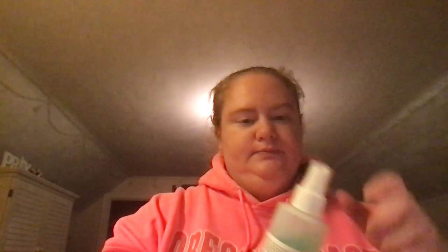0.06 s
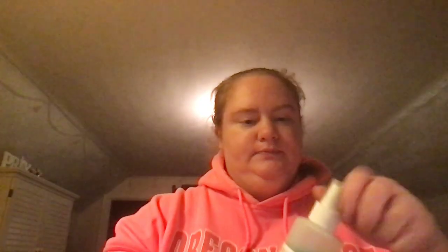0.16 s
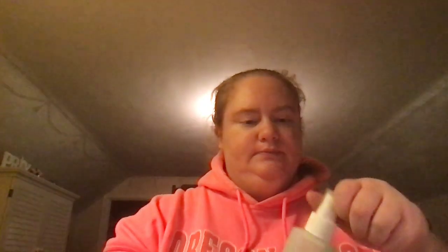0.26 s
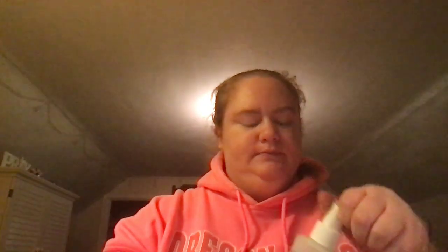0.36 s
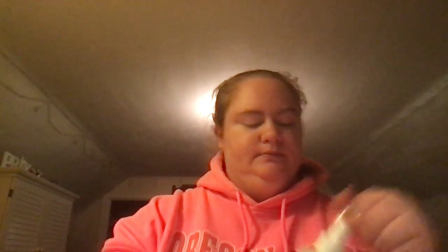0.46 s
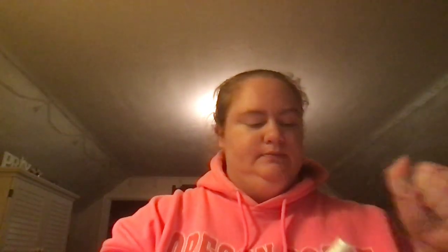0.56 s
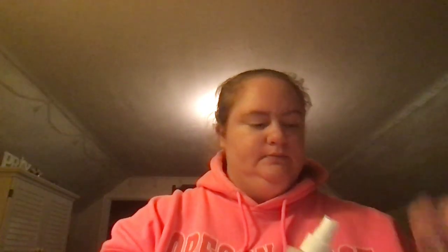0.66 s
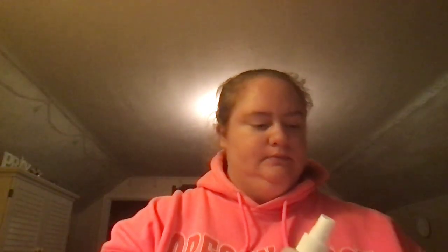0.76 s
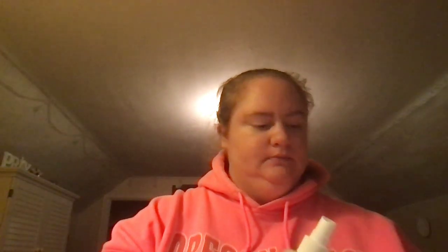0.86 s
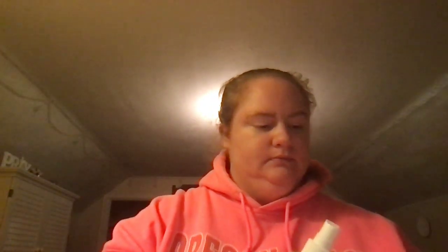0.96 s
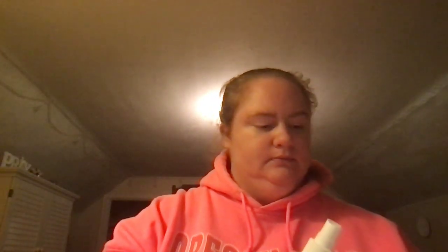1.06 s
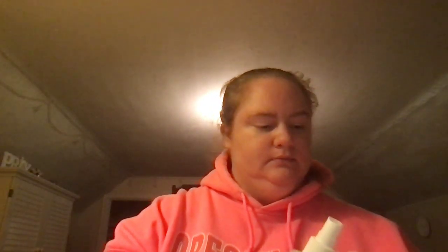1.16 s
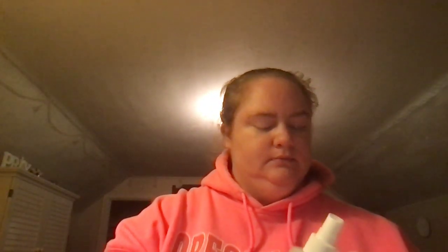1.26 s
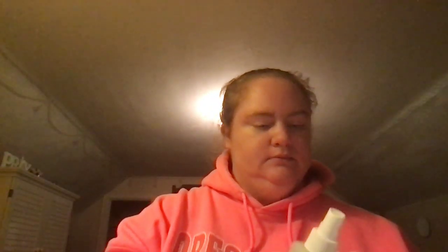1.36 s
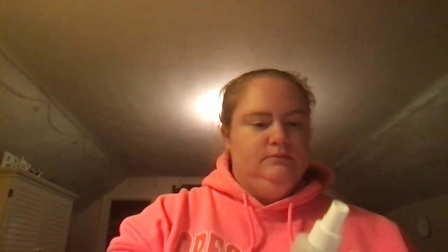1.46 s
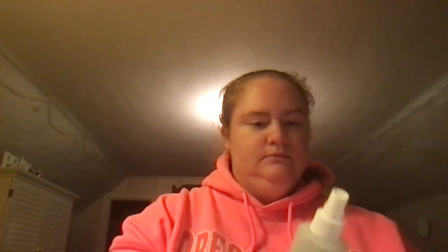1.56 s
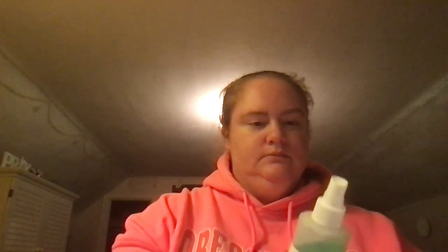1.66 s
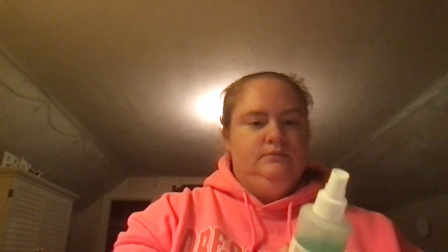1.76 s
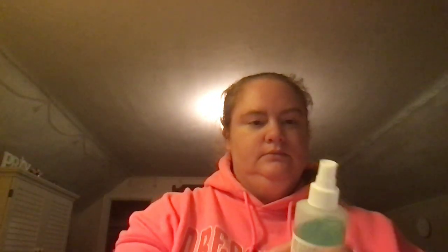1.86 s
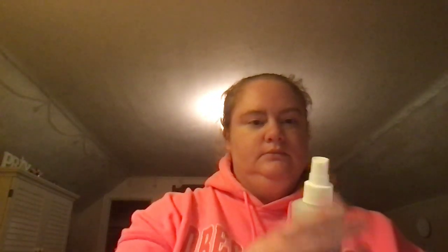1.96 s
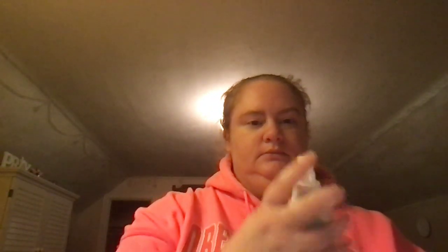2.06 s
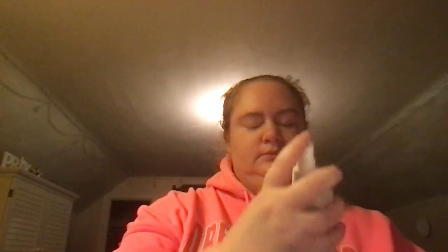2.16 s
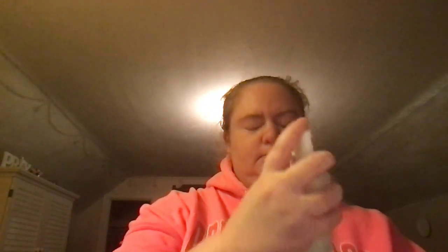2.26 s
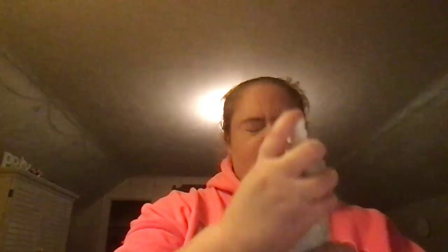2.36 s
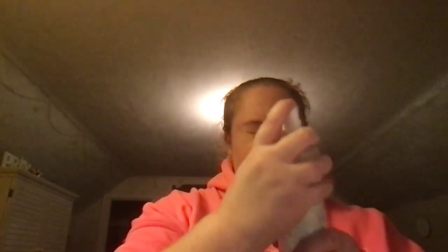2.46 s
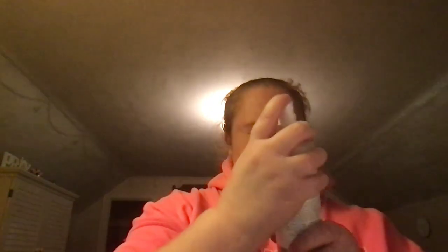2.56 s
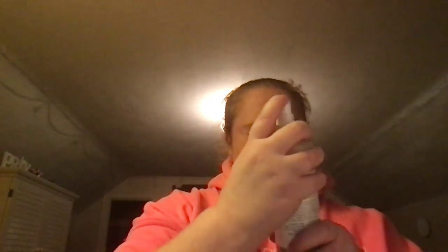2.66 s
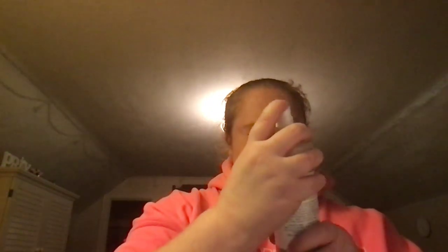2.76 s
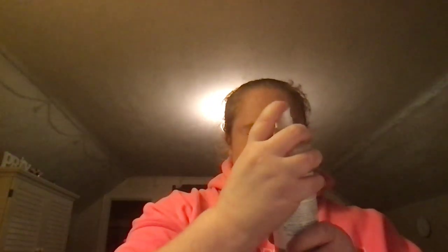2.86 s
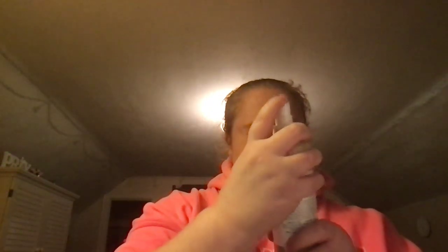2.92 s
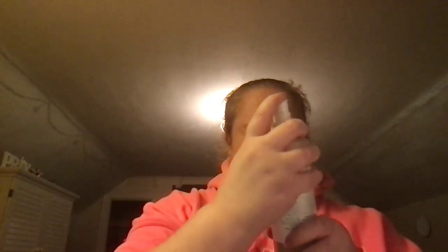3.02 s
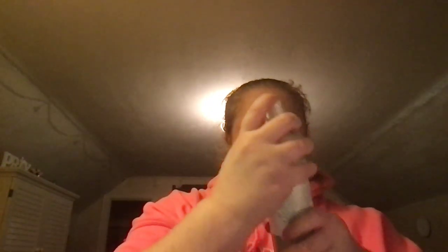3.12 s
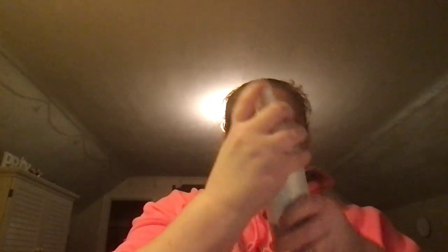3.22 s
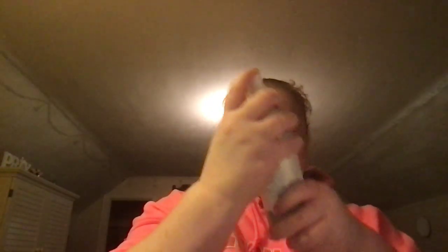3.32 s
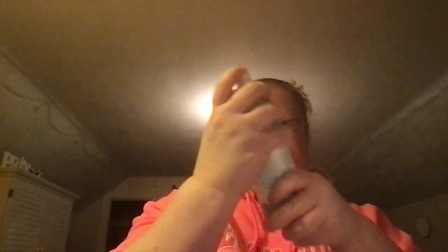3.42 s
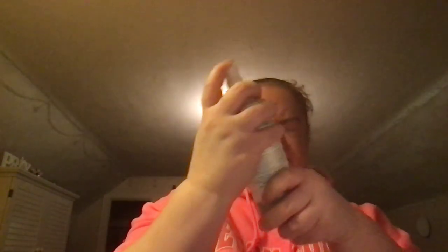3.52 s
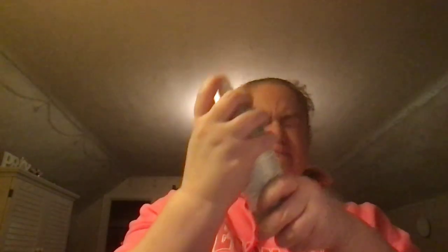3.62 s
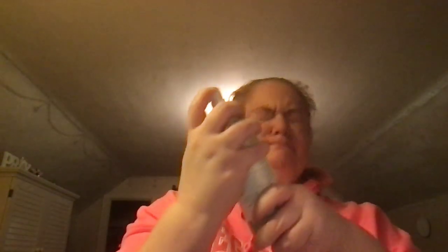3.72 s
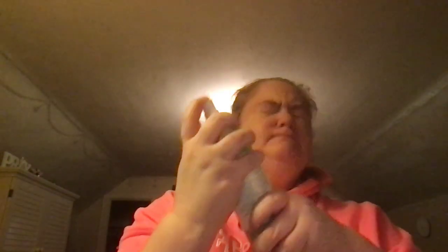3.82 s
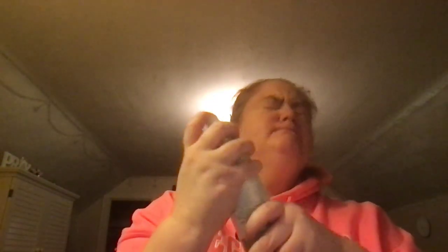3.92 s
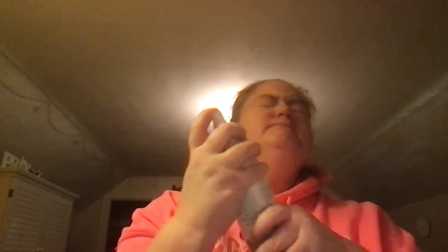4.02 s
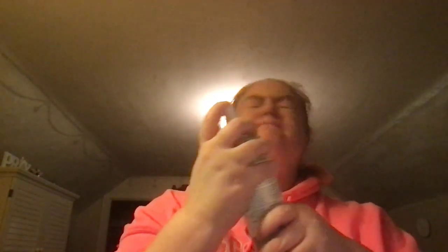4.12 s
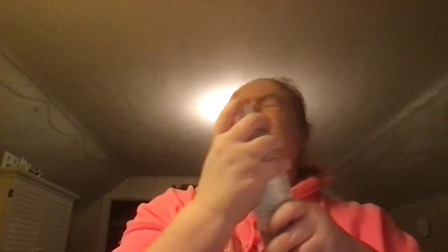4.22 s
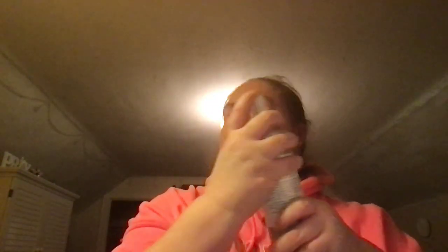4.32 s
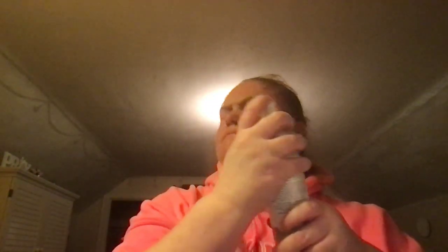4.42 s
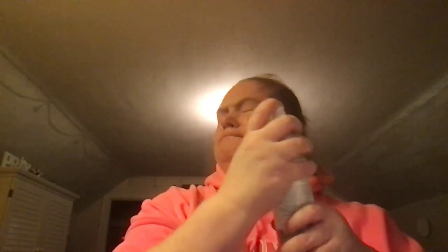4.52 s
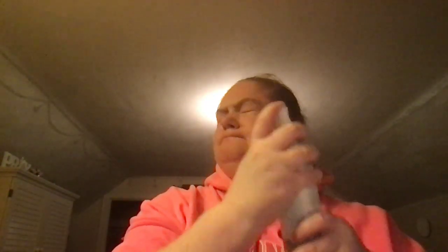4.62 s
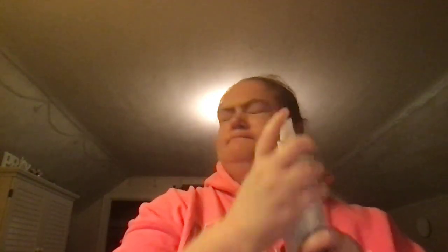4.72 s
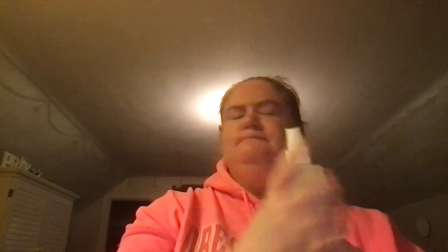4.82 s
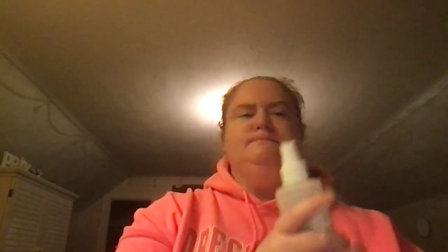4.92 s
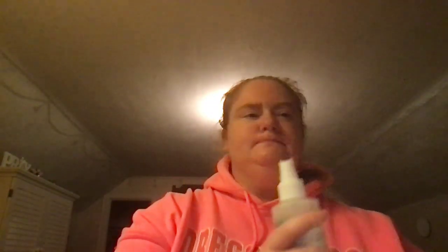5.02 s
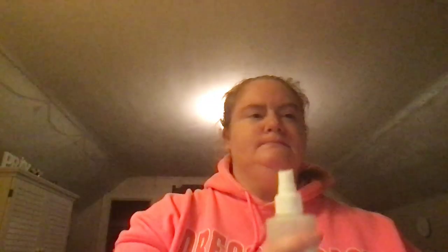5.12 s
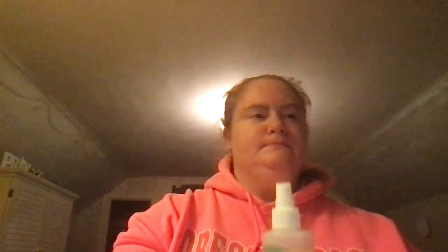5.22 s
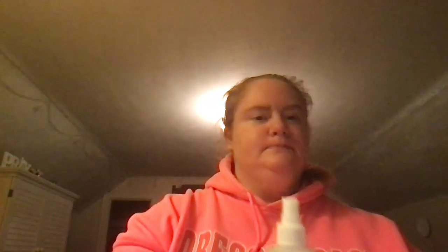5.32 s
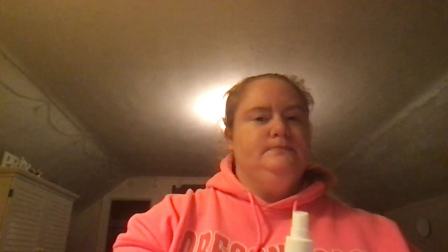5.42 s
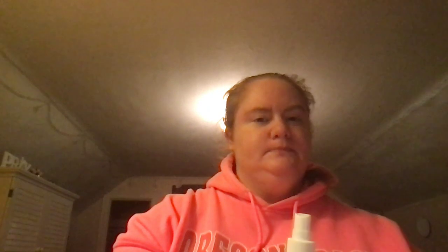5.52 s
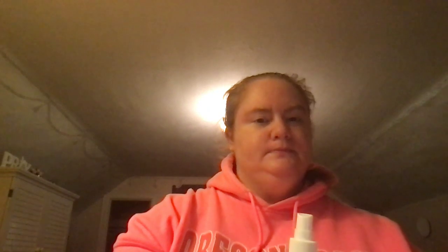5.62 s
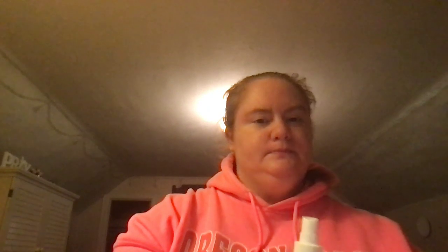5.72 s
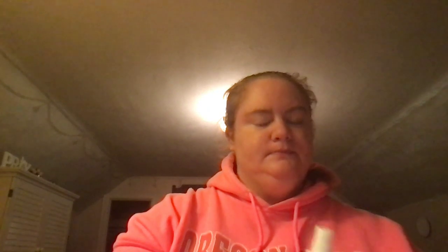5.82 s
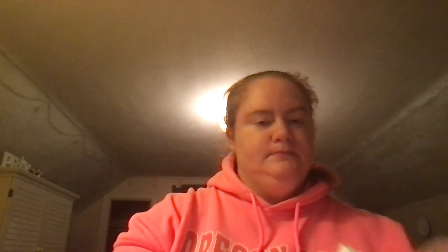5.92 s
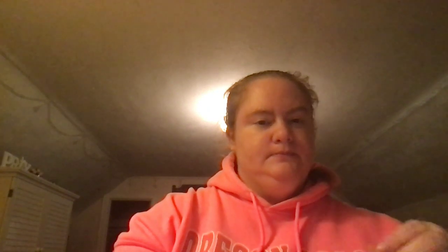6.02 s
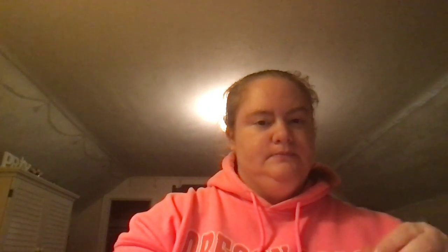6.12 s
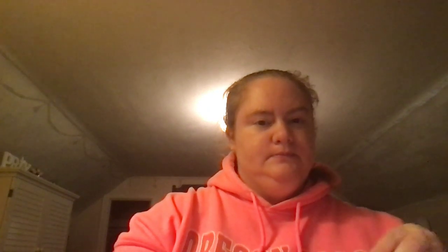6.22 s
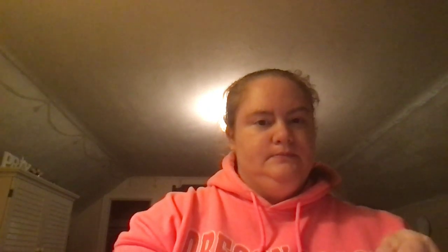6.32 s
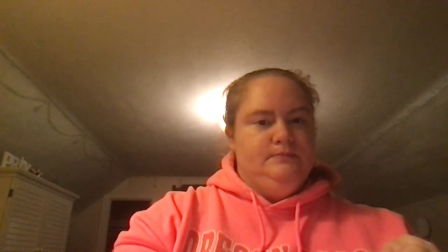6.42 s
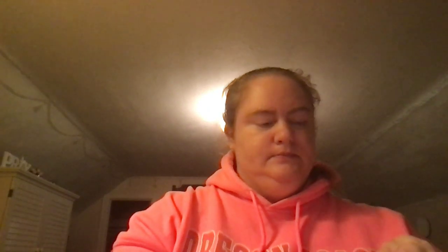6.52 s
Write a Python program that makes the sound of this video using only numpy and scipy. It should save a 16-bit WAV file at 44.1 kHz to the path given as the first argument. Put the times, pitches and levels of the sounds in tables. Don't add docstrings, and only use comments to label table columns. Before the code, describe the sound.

A hollow plastic cap snaps off and clatters on a desk, a pump sprayer clicks out seven quick mists, then the cap snaps back on.

```python
import sys
import numpy as np
from scipy import signal
from scipy.fft import rfft, irfft, next_fast_len
from scipy.io import wavfile
from scipy.ndimage import uniform_filter1d, map_coordinates

SR = 44100
rng = np.random.default_rng(int(sys.argv[2]) if len(sys.argv) > 2 else 0)


def level_to_linear(level):
    exponent = np.asarray(level, float) / 20
    return 10 ** exponent


def pcm_store(signal):
    levels = np.round(np.clip(np.atleast_2d(signal), -1, 1) * 32767)
    wavfile.write(sys.argv[1], SR, levels.astype(np.int16).T)


N = 290178


def unit(x):
    return x / np.sqrt(np.mean(x ** 2) + 1e-20)


def along(points, hz):
    point_hz, value = np.transpose(points)
    return np.interp(np.log(hz + 1), np.log(point_hz + 1), value)


def curve(rows):
    s, db = np.transpose(rows)
    return np.interp(np.arange(N) / SR, s, db)


def wobble(rate):
    knots = rng.standard_normal(int(N * rate / SR) + 4)
    return map_coordinates(knots, [np.arange(N) * rate / SR])


def soft(gain):
    return uniform_filter1d(gain, size=300)


def swells(rows):
    t, total = np.arange(N) / SR, np.zeros(N)
    for s, hold, db, rise, fall in rows:
        below_db = 20 * np.maximum(s - t, 0) / rise + 20 * np.maximum(t - s - hold, 0) / fall
        total += level_to_linear(db - below_db)
    return total


def hiss(spectrum, grain_db):
    m = next_fast_len(N + 8192)
    grain = uniform_filter1d(rng.standard_normal(N), size=24) * np.sqrt(24)
    white = rng.standard_normal(N) * level_to_linear(grain_db * grain)
    colour = level_to_linear(along(spectrum, np.fft.rfftfreq(m, 1 / SR)))
    return unit(irfft(rfft(white, m) * colour, m)[:N])


def patchy(x, depth_db):
    z = signal.stft(x, nperseg=512)[2]
    field = uniform_filter1d(rng.standard_normal(z.shape), size=14, axis=0)
    field = uniform_filter1d(field, size=12, axis=1)
    return unit(signal.istft(z * level_to_linear(depth_db * unit(field)), nperseg=512)[1][:N])


def ring(t, hz, t60, attack=0.00024):
    return np.sin(2 * np.pi * hz * t) * level_to_linear(-60 * t / t60) * (1 - np.exp(-t / attack))


def burst(t, lo_hz, hi_hz, t60):
    band = signal.butter(3, np.clip([lo_hz, hi_hz], 50, .45 * SR), "band", fs=SR, output="sos")
    noise = unit(signal.sosfilt(band, rng.standard_normal(len(t))))
    return noise * level_to_linear(-60 * t / t60) * (1 - np.exp(-t / 0.00012))


def add(track, s, sound):
    track[round(s * SR):][:len(sound)] += sound


def taps(table, clack_db, attack=0.00016, top_db=-10):
    out, t = np.zeros(N + SR), np.arange(SR // 16) / SR
    for s, db, hz, t60, crack_db in table:
        shell = ring(t, hz, t60, attack) + level_to_linear(clack_db) * burst(t, .3 * hz, 2 * hz, .7 * t60)
        shell *= rng.choice([-1, 1])
        crack = burst(t, 3100, 7710, 0.0061) + level_to_linear(top_db) * burst(t, 8000, 16000, 0.0059)
        add(out, s, level_to_linear(db + 5.0) * shell + level_to_linear(db + crack_db + 7.5) * crack)
    return out[:N]


def thuds(table, thud_hz, thud_t60):
    out, t = np.zeros(N + SR), np.arange(SR // 5) / SR
    for s, db in table:
        low_hz = thud_hz * (1 + 0.074 * rng.standard_normal())
        body = ring(t, low_hz, thud_t60, 0.002)
        body += 0.79 * burst(t, 1.16 * low_hz, 1.98 * low_hz, 0.71 * thud_t60)
        add(out, s, level_to_linear(db + 5.5) * body)
    return out[:N]


def muffled(x):
    return signal.sosfilt(signal.butter(4, 2500, fs=SR, output="sos"), x)


# time in seconds, level in dB.
FAN_LEVEL = [(0.0, -56.5), (0.58, -53), (1.21, -60.5), (1.43, -70), (1.68, -72.5), (2.29, -53), (2.56, -57),
             (2.84, -90), (3.3, -85.5), (4.31, -74.5), (4.75, -63.5), (5.31, -60.5), (5.66, -65.5),
             (5.79, -60.5), (6.36, -61.5), (6.45, -81.5), (6.58, -72)]
# frequency in Hz, density in dB per Hz.
FAN_COLOUR = [(150, -45), (280, -4), (450, -3), (650, -14.5), (1100, -17), (2000, -16), (4000, -47.5),
              (8000, -120)]
AIR_COLOUR = [(12, -30), (25, -5), (50, 0), (90, -3), (130, -9), (220, -11), (800, -19), (1600, -22),
              (3200, -24), (5000, -29), (8000, -34), (13000, -36.5), (16000, -39)]


def air():
    fan_db = curve(FAN_LEVEL)
    fan = level_to_linear(fan_db - 7.5 + 1.4 * wobble(6.5)) * hiss(FAN_COLOUR, grain_db=1.5)
    tone_db = -67.5 + .17 * (fan_db - fan_db.mean()) + 0.23 * wobble(4.3)
    return fan + level_to_linear(tone_db) * hiss(AIR_COLOUR, grain_db=1.5)


# frequency in Hz, t60 in seconds.
ROOM_DECAY = [(200, 0.3), (2000, 0.12), (8000, 0.1), (15000, 0.05)]


def room(x):
    hz, t, z = signal.stft(rng.standard_normal(SR // 2), SR, nperseg=256)
    dying = z * level_to_linear(-60 * t / along(ROOM_DECAY, hz)[:, None])
    tail = signal.istft(dying, SR, nperseg=256)[1]
    delayed = np.pad(x, (150, 0))
    return signal.fftconvolve(delayed, tail / np.linalg.norm(tail))[:N]


# start in seconds,
# level in dB, frequency in Hz, t60 in seconds.
LOW_THUMPS = [(2.5, -65, 81, 0.12), (2.394, -49.5, 88, 0.33), (2.416, -52, 114.3, 0.19),
              (2.761, -49.5, 78.5, 0.15), (0.514, -45, 82, 0.078), (0.519, -34.5, 143, 0.095),
              (0.5469, -32.5, 314, 0.1), (1.2034, -35, 161.5, 0.072), (1.232, -45.5, 145, 0.16),
              (5.68, -42.5, 152, 0.14), (5.681, -35, 272, 0.051), (5.781, -33, 222, .04),
              (6.345, -30.5, 270, 0.04), (6.449, -29, 257, 0.051)]


def desk():
    out, t = np.zeros(N + SR), np.arange(SR // 4) / SR
    for s, db, hz, t60 in LOW_THUMPS:
        add(out, s, level_to_linear(db) * ring(t, hz, t60, 0.0019))
    return out[:N]


# full level at seconds, hold in seconds, level in dB, rise and fall in seconds.
SLEEVE_PASSES = [
    (1.412, 0.054, -60.5, 0.0083, 0.039),
    (1.676, 0.01, -72, 0.026, 0.02),
    (1.75, 0.046, -51, 0.02, 0.041),
    (1.89, 0.06, -56, .025, 0.097),
    (5.112, 0.019, -50.5, 0.02, 0.028),
]
# frequency in Hz, density in dB per Hz.
CLOTH_COLOUR = [(4000, -10), (6500, -11), (8500, -1.5), (11500, -6), (13500, -1), (16500, 0)]


def sleeve():
    gain = soft(swells(SLEEVE_PASSES) * level_to_linear(1.0 * wobble(29.95)))
    return gain * level_to_linear(-3.5) * patchy(hiss(CLOTH_COLOUR, grain_db=3.0), 2)


def clasp():
    u = np.clip((np.arange(N) / SR - 2.025) / .105, 0, 1)
    from_hz, to_hz, width_hz = 4500, 7600, 1100
    phase = 2 * np.pi * np.cumsum(from_hz + (to_hz - from_hz) * u) / SR
    band = wobble(width_hz) * np.cos(phase) + wobble(width_hz) * np.sin(phase)
    return level_to_linear(-49.5) * np.sin(np.pi * u) ** 0.95 * band


# full level at seconds, hold in seconds, level in dB, rise and fall in seconds.
FIRST_SLIDE = (.25, .025, -54, .05, .05)
FINGER_SLIDES = [
    (2.09, 0.039, -46.5, 0.27, 0.062),
    (5.032, 0.014, -58.5, 0.014, 0.05),
    (6.322, .002, -46, 0.0023, 0.03),
    (0.513, 0.039, -58, .02, 0.038),
]
PALM_SLIDES = [
    (4.79, 0.071, -54, 0.062, .04),
    (4.895, 0.077, -50, 0.092, 0.031),
]
CUPPED_WHISTLE = [
    (4.885, 0.064, -59, 0.15, 0.073),
]
# frequency in Hz, density in dB per Hz.
SKIN_COLOUR = [(2500, -12.5), (3800, -2.5), (5200, -0.5), (7800, -2.5), (10000, -10), (13500, -6),
               (16500, -12)]
WALL_COLOUR = [(1500, -28), (2400, 13.5), (4500, -8), (6000, -33), (8000, -50), (11000, -41)]
PALM_COLOUR = [(2800, -14.5), (4200, -1.5), (6000, -1.5), (8000, -1), (10000, -6), (13500, -4), (16500, -5)]
CUP_COLOUR = [(1900, -30), (2250, -4), (2500, -3), (2750, -13), (3300, -45)]


def skin():
    gain = soft(swells([FIRST_SLIDE] + FINGER_SLIDES) * level_to_linear(1.1 * wobble(44)))
    finger = level_to_linear(-0.5) * patchy(hiss(SKIN_COLOUR, grain_db=2.0), 1.6)
    wall = level_to_linear(-15) * hiss(WALL_COLOUR, grain_db=1)
    palm = soft(swells(PALM_SLIDES)) * patchy(hiss(PALM_COLOUR, grain_db=2.0), depth_db=0.9)
    whistle = swells(CUPPED_WHISTLE) * hiss(CUP_COLOUR, grain_db=2.0)
    return gain * (finger + wall) + palm + whistle


# full level at seconds, hold in seconds, level in dB, rise and fall in seconds.
RATTLES = [(1.2, .04, -60.5, 0.025, 0.05), (1.265, .02, -60.5, .03, 0.033), (3.1, 1.42, -66.5, 0.046, 0.79),
           (5.612, 0.078, -65, 0.034, 0.054), (5.76, 0.01, -50.5, 0.03, .03),
           (5.865, 0.02, -49.5, 0.041, 0.02), (5.9, 0.036, -61, .02, 0.27),
           (6.113, .004, -68, 0.0019, 0.064), (6.178, .004, -64, 0.072, 0.038),
           (6.2, .07, -66, 0.023, .035), (6.325, 0.0014, -42.5, 0.0097, 0.0092),
           (6.45, .004, -61, 0.0022, 0.036)]
LOW_SCUFFS = [
    (3.01, 1.36, -67.5, 0.44, 0.36),
    (5.69, 0.0036, -56.5, 0.1, 0.034),
    (5.768, 0.03, -52, 0.027, 0.058),
    (5.865, 0.025, -47, 0.039, 0.04),
    (6.113, 0.0035, -54.5, 0.0018, 0.042),
    (6.178, 0.016, -58, 0.045, 0.037),
    (6.325, 0.0017, -37.5, 0.014, 0.012),
    (6.45, 0.028, -63, .002, 0.13),
]
CAP_RUBS = [
    (5.755, .012, -58, 0.034, .01),
    (6.12, .01, -56.5, .004, 0.059),
    (6.176, 0.0036, -51, 0.016, .01),
    (6.19, .03, -64, .01, .07),
    (1.4, .015, -67, .03, .03),
]
# frequency in Hz, density in dB per Hz.
CHATTER_COLOUR = [(200, -18), (500, 1), (1000, -5), (1800, -1.5), (2800, -2.5), (4000, -5.5), (5500, -9),
                  (8000, -27.5), (12000, -42)]
SCUFF_COLOUR = [(150, -14), (300, 1), (600, 3.5), (1100, -7), (2000, -26)]
CAP_COLOUR = [(1200, -17), (1900, -0.5), (2500, -1), (3200, 7.5), (3800, -10), (5500, -15.5), (9000, -27),
              (14000, -41)]


def rattle():
    shake = level_to_linear(2 * wobble(70))
    chatter = soft(swells(RATTLES)) * shake * hiss(CHATTER_COLOUR, grain_db=-3.0)
    scuff = soft(swells(LOW_SCUFFS)) * shake * hiss(SCUFF_COLOUR, grain_db=2.5)
    return chatter + scuff + swells(CAP_RUBS) * hiss(CAP_COLOUR, grain_db=-2.0)


# start in seconds, peak in dB, ring in Hz, ring t60 in seconds,
# crack in dB re peak.
CAP_OFF = [
    (.5118, -32.5, 1240, 0.027, -24),
    (.5122, -39, 2300, 0.013, -30),
    (.5178, -39, 2420, .016, -9),
    (.5212, -40, 890, 0.0034, -6),
    (.5273, -29.5, 1900, 0.0066, -7),
    (.5295, -30, 2640, 0.0046, -8),
    (.5302, -27, 1810, 0.026, -5.5),
    (.5416, -41, 2100, .014, 1),
    (.545, -29.5, 2250, 0.008, -17),
    (.5466, -25, 2000, 0.0053, -9.5),
]
CAP_DROP = [(1.1556, -9, 2055, 0.01, -52.5), (1.1558, -24.5, 646, 0.0066, -38.5),
            (1.1558, -31.5, 4250, .004, -39.5), (1.1642, -34, 1880, .03, -26),
            (1.161, -31, 2500, .012, -30.5), (1.1645, -29, 2050, .012, -25),
            (1.1665, -34, 1140, 0.015, -30), (1.168, -30, 2590, 0.01, -24.5),
            (1.1706, -27, 1850, .006, -39), (1.1718, -19.5, 1770, 0.011, -39),
            (1.1766, -20.5, 1670, 0.0085, -28), (1.1795, -30, 1500, 0.0071, -30),
            (1.1848, -23, 1300, .0075, -43.5), (1.187, -22.5, 1310, 0.0045, -33.5),
            (1.187, -23, 2660, 0.0051, -36.5), (1.188, -32, 4140, 0.0053, -33.5),
            (1.195, -51, 2050, .02, -29), (1.2035, -48, 2100, 0.025, -25), (1.221, -51, 1750, .012, -30),
            (1.2293, -47, 1900, 0.012, -30), (1.234, -46, 1450, .015, -30), (1.262, -52, 1550, .015, -25),
            (1.272, -53, 1650, .015, -20)]
CAP_ON = [(6.1126, -30, 2580, 0.017, -29), (6.113, -33, 3330, 0.011, -31),
          (6.1487, -19.5, 1850, 0.0021, -34), (6.1814, -22, 3060, 0.0085, -41),
          (6.1833, -28.5, 1920, 0.015, -19), (6.2545, -24.5, 1640, 0.018, -46),
          (6.2635, -32.5, 1680, 0.015, -34), (6.2983, -33, 2900, 0.0064, -6.5),
          (6.2985, -37, 1500, 0.011, -15), (6.3158, -20, 1666, 0.012, -19),
          (6.3173, -7, 2430, 0.0033, -18.5), (6.3191, -17, 1900, 0.0061, -21),
          (6.3235, -35.5, 1700, 0.0085, -10), (6.3325, -45, 2400, .006, -8), (6.3432, -40, 2700, 0.006, -4),
          (6.352, -53, 2600, .005, -9), (6.4478, -5, 2240, 0.0019, -54), (6.4484, -22, 1150, 0.005, -21)]
# start in seconds, level in dB.
CAP_THUDS = [
    (.5174, -31.5),
    (.5215, -35),
    (.5414, -42),
    (6.1126, -46),
    (6.1814, -39),
    (6.2545, -38.5),
    (6.3176, -36.5),
    (6.333, -46),
    (6.4478, -35.5),
]
DESK_THUDS = [
    (1.1556, -41.5),
    (1.1642, -52),
    (1.1761, -63),
    (1.2025, -48),
    (2.4155, -53.5),
]


def cap():
    snap_off = taps(CAP_OFF, -3.5, top_db=-5.0)
    drop = taps(CAP_DROP, -22.5)
    snap_on = taps(CAP_ON, -13.0, top_db=-8.5)
    return snap_off + drop + snap_on + thuds(CAP_THUDS, 314, 0.038) + thuds(DESK_THUDS, 178.0, 0.081)


# start in seconds, peak in dB, ring in Hz, ring t60 in seconds,
# crack in dB re peak.
SET_DOWN = [(5.0275, -50.5, 2360, 0.016, 4), (5.6082, -54, 1530, 0.025, -32),
            (5.6368, -59, 1340, 0.025, -26), (5.6805, -30.5, 3030, 0.0047, -14.5),
            (5.7728, -26, 1964, 0.013, -5), (5.7825, -39, 1460, 0.0088, -28),
            (5.846, -39, 1550, 0.019, -33), (5.8527, -38, 1610, 0.012, -37),
            (5.8595, -36, 2250, 0.023, -33), (5.8708, -38, 1280, 0.0064, -5),
            (5.8806, -35, 1600, 0.0074, -8), (5.8944, -51, 1560, 0.031, -38)]
GRIPS = [
    (2.412, -43, 1170, 0.005, -43),
    (2.4158, -33.5, 2500, 0.011, -55),
    (2.4158, -41.5, 1500, 0.0059, -55),
    (4.689, -57, 1145, 0.0082, -33),
]
# start in seconds, level in dB.
GRIP_THUDS = [
    (2.4155, -47),
    (4.689, -49),
    (4.812, -54),
    (5.0275, -58),
    (5.04, -51.5),
]
BOTTLE_THUDS = [
    (5.6368, -65),
    (5.6805, -43),
    (5.7728, -43),
    (5.7817, -47),
    (5.8102, -47),
    (5.8527, -49),
    (5.8595, -41.5),
    (5.8806, -53),
    (5.9754, -54.5),
]


def bottle():
    grips = muffled(taps(GRIPS, -1.3, 0.00084)) + thuds(GRIP_THUDS, 283, 0.045)
    return taps(SET_DOWN, -2.5) + grips + thuds(BOTTLE_THUDS, 194, 0.054)


# start in seconds, peak in dB.
GLASS_TOUCHES = [
    (5.6805, -55),
    (5.7735, -46),
    (5.8599, -28),
    (5.8691, -28.5),
    (5.881, -45),
]
# frequency in Hz, level in dB, t60 in seconds.
GLASS_MODES = [(3530, -10, .09), (5280, 0, .075), (6858, -2, .1), (8780, -3, .06), (11080, -2, .125),
               (13070, -11, .075)]


def jar():
    out, t = np.zeros(N + SR), np.arange(SR // 4) / SR
    for s, db in GLASS_TOUCHES:
        chink = sum(level_to_linear(g + rng.normal(0, 1.5)) * ring(t, hz, .72 * t60) for hz, g, t60 in GLASS_MODES)
        add(out, s, level_to_linear(db - 13) * chink)
    return out[:N]


# start in seconds, peak in dB, frequency in Hz.
CREAKS = [(2.9624, -59, 4530), (2.9841, -60, 5640), (3.0016, -57, 7100), (3.27, -53, 5230),
          (3.5328, -50, 5230), (3.574, -56, 7400), (3.616, -52, 4400), (3.616, -58, 6100),
          (3.616, -51, 12500), (3.8536, -56, 4800), (4.075, -47, 4740), (4.1055, -48, 5270),
          (4.123, -52, 5300), (4.342, -54, 4800), (4.3714, -52, 5530), (4.389, -55, 4500),
          (4.7082, -47.5, 5360), (4.7275, -49, 7070), (5.31, -58, 13000), (4.813, -40, 6900),
          (4.813, -45, 5000), (4.7082, -58, 6800), (4.7275, -47, 5600), (4.7275, -56, 8200),
          (3.533, -54, 8000), (3.573, -54, 7500), (5.0448, -50.5, 4740), (2.984, -60, 7300),
          (3.288, -58, 7500), (3.312, -60, 7600), (3.795, -54, 7700), (3.803, -56, 7500),
          (3.832, -54, 7400), (4.098, -56, 7500), (3.79, -57, 5300)]


def spring():
    out, t = np.zeros(N + SR), np.arange(SR // 20) / SR
    for s, db, hz in CREAKS:
        add(out, s, level_to_linear(db - 6) * burst(t, .9 * hz, 1.12 * hz, 1.5 * 0.014))
    return out[:N]


# start in seconds, end in seconds, level in dB.
PISTON_RISES = [
    (2.922, 3.042, -62),
    (3.235, 3.344, -59),
    (3.5, 3.606, -61),
    (3.756, 3.868, -60),
    (4.025, 4.135, -62.5),
    (4.283, 4.405, -63),
    (4.56, 4.75, -64),
]
# frequency in Hz, density in dB per Hz.
GURGLE_COLOUR = [(300, -7.5), (600, -5.5), (1200, 2.5), (2200, -3), (2800, -20), (4000, -30), (10000, -55)]
COIL_COLOUR = [(4000, -30), (4900, -10), (5400, 0), (6200, -9), (7500, -5), (8400, -23), (10000, -40)]


def refill():
    t, suction = np.arange(N) / SR, np.zeros(N)
    for start, end, db in PISTON_RISES:
        travel = np.clip((t - start) / (end - start), 0, 1)
        suction += level_to_linear(db - 1.5) * np.sin(np.pi * travel) ** 0.33
    coil = level_to_linear(-14.5 + 3.2 * wobble(60)) * hiss(COIL_COLOUR, grain_db=3.5)
    gurgle = level_to_linear(3 * wobble(90)) * hiss(GURGLE_COLOUR, grain_db=3.5)
    return suction * (gurgle + coil)


# start in seconds, peak in dB, ring in Hz, ring t60 in seconds.
HEAD_KNOCKS = [(2.926, -41, 1700, 0.011), (2.961, -39.5, 1740, 0.011), (3.009, -40.5, 1640, 0.0097),
               (3.244, -39, 1660, 0.011), (3.27, -38.5, 1670, 0.0085), (3.286, -41.5, 2030, 0.009),
               (3.309, -48, 1580, 0.009), (3.508, -41.5, 1140, 0.014), (3.531, -41.5, 1980, 0.017),
               (3.571, -47, 1190, 0.01), (3.581, -42, 1690, 0.0098), (3.765, -39.5, 1200, 0.011),
               (3.79, -39.5, 1170, 0.014), (3.838, -38.5, 1250, 0.0081), (4.032, -39, 1190, 0.015),
               (4.055, -43, 1170, 0.013), (4.075, -44, 2020, 0.009), (4.107, -42.5, 1700, 0.011),
               (4.122, -53, 1130, 0.009), (4.299, -36, 1140, 0.011), (4.326, -36, 1220, 0.0093),
               (4.37, -43.5, 1160, 0.0084), (4.582, -41, 2000, 0.014), (4.627, -47, 1050, 0.0095),
               (4.692, -44, 1160, 0.0051), (4.709, -47, 1250, 0.009)]
NOZZLE_STOPS = [
    (3.009, -57, 3090, 0.023),
    (3.5815, -51, 3030, 0.01),
    (3.839, -52, 3260, 0.0088),
    (4.106, -50, 3200, 0.022),
    (4.372, -51, 3050, .015),
]
# start in seconds, level in dB.
RETURN_THUDS = [(2.923, -48), (3.005, -49.5), (3.24, -45), (3.269, -58), (3.318, -57), (3.501, -47),
                (3.577, -49), (3.758, -44.5), (3.835, -43.5), (4.025, -45), (4.104, -44.5), (4.292, -43),
                (4.37, -47), (4.576, -49.5)]


def rebound():
    crack_db = -41
    knocks = [(s, db - 3, hz, 0.86 * t60, crack_db) for s, db, hz, t60 in HEAD_KNOCKS]
    clacks = taps(knocks, clack_db=-2.0, attack=0.00035)
    nozzle = taps([(*row, crack_db) for row in NOZZLE_STOPS], clack_db=-8)
    return muffled(clacks) + nozzle + thuds(RETURN_THUDS, 278, 0.047)


# start in seconds, length in seconds, level in dB.
MIST_JETS = [
    (2.761, 0.033, -48),
    (3.134, 0.035, -46.5),
    (3.419, 0.044, -47),
    (3.669, 0.047, -47.5),
    (3.929, 0.05, -46),
    (4.208, 0.041, -45.5),
    (4.465, 0.046, -46.5),
]
# frequency in Hz, density in dB per Hz.
MIST_COLOUR = [(290, -22), (500, -21.5), (1010, -17), (1760, -10.5), (2190, -10), (2360, -7), (4830, -9.5),
               (6280, -7), (9060, -19), (15100, -21), (15800, -17), (16500, -39)]


def mist():
    t, flow = np.arange(N) / SR, np.zeros(N)
    for s, length, db in MIST_JETS:
        rise = np.clip((t - s) / .002, 0, 1) * (.8 + .2 * np.clip((t - s) / .012, 0, 1))
        after = np.maximum(t - s - length, 0)
        flow += level_to_linear(db) * rise * (1.68 * np.exp(-after / 0.0055) + 0.5 * np.exp(-after / 0.031))
    return flow * level_to_linear(0.32 * wobble(230)) * hiss(MIST_COLOUR, grain_db=1.5)


# click in seconds, click level in dB, finger lead in seconds,
# landing in dB re click, ring length as a factor.
PRESSES = [
    (3.1005, -24.5, 0.0077, -10, 1.5),
    (3.378, -25.5, 0.0077, -10.5, 1.05),
    (3.6366, -23, 0.0098, -11.5, 1),
    (3.898, -26, 0.0093, -9.5, 0.95),
    (4.1768, -26, 0.0082, -10, 0.8),
    (4.4328, -26, 0.0072, -9, .95),
]
# frequency in Hz, level in dB, t60 in seconds.
PUMP_MODES = [(2552, -8, 0.053), (2500, 1, 0.014), (2322, -4.5, 0.025), (2750, -19, 0.019),
              (5480, -5.5, 0.0094), (289, -19.5, 0.058)]


def pump():
    out, t = np.zeros(N + SR), np.arange(SR // 6) / SR
    brush_s = 0.0087
    for s, db, lead, land_db, rings in PRESSES:
        click = np.zeros(len(t))
        for hz, g, t60 in PUMP_MODES:
            level_chance, pitch_chance = rng.standard_normal(2)
            click += level_to_linear(g + 1.1 * level_chance) * ring(t, hz * (1 + 0.0097 * pitch_chance), rings * t60)
        clack = 0.18 * burst(t, 2000, 2970, 0.13) + 0.3 * burst(t, 245, 1930, 0.033)
        clack += 0.087 * burst(t, 3800, 6830, 0.081) + 0.028 * burst(t, 6400, 25000, 0.0058)
        add(out, s, level_to_linear(db) * (click + clack))
        land = ring(t, 351, 0.038, 0.00032) + 0.87 * burst(t, 270, 2540, 0.017)
        land += 0.75 * burst(t, 5460, 6220, 0.013) + 0.086 * burst(t, 7100, 13700, 0.016)
        add(out, s - lead, level_to_linear(db + land_db) * land)
        brush = burst(t, 300, 5900, 0.047) * np.clip(t / brush_s, 0, 1)
        add(out, s - lead - brush_s, level_to_linear(db - 28) * brush)
    return out[:N]


def scene():
    hands = sleeve() + clasp() + skin() + rattle()
    pumping = spring() + refill() + rebound() + mist() + pump()
    near = hands + cap() + bottle() + jar() + pumping
    return (air() + desk() + level_to_linear(-15.5) * room(near) + near)[None]


def low_pass(x):
    return signal.sosfilt(signal.butter(12, 16820, fs=SR, output="sos"), x)


# frequency in Hz, gain in dB.
MIC_EDGE = [(15500, 0), (15900, -14), (16600, -18), (16900, -60)]


def record(dry):
    edge = level_to_linear(along(MIC_EDGE, np.fft.rfftfreq(N, 1 / SR)))
    mix = irfft(rfft(dry) * edge, N)
    return low_pass(mix)


dry = scene()
out = record(dry)
pcm_store(out)
```